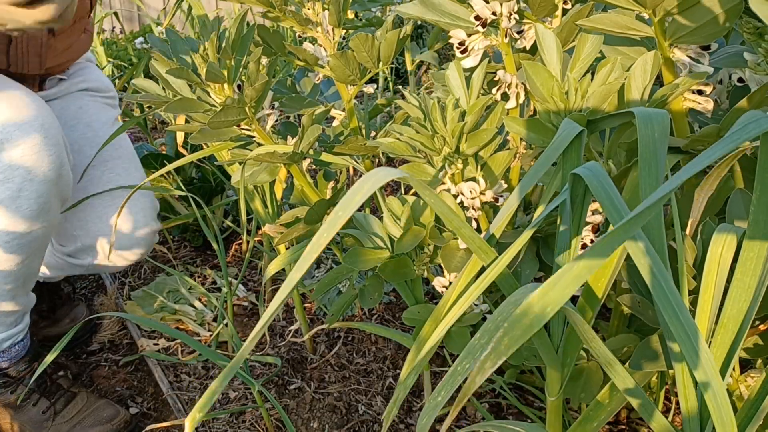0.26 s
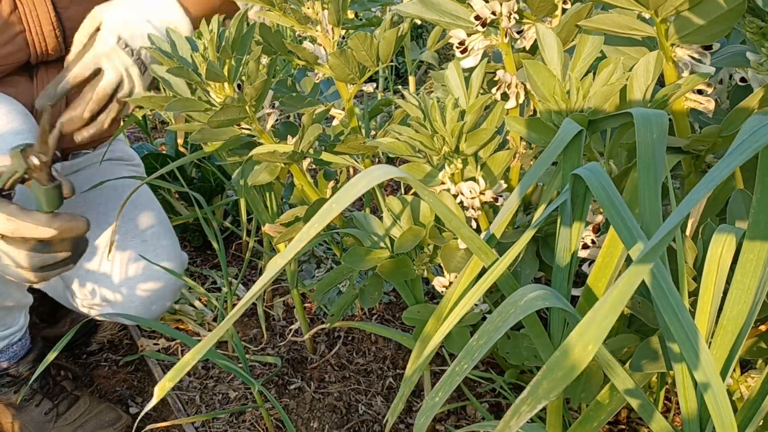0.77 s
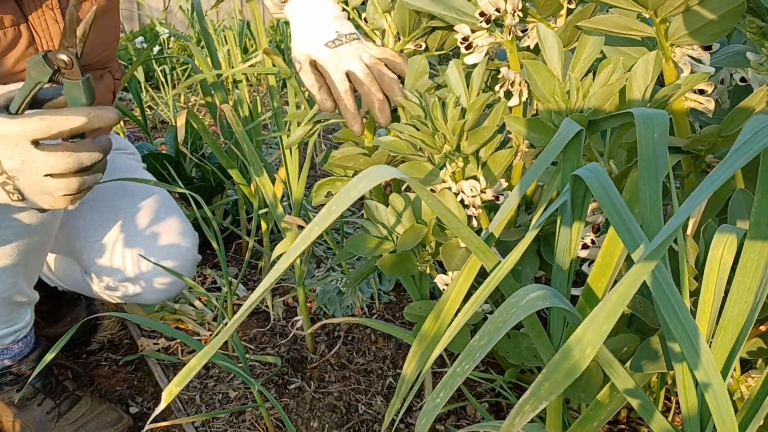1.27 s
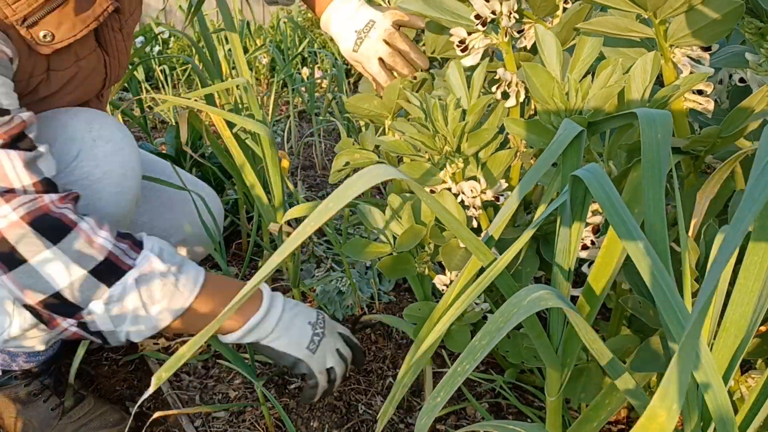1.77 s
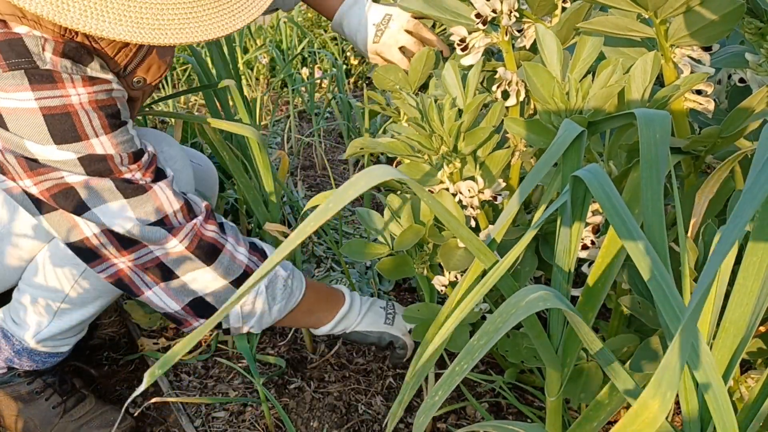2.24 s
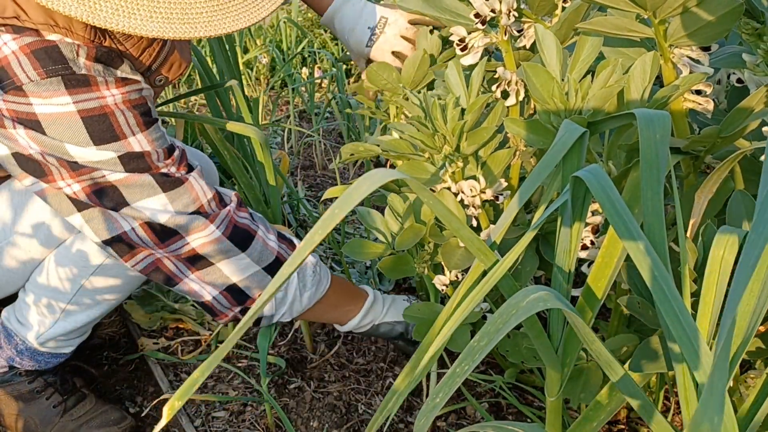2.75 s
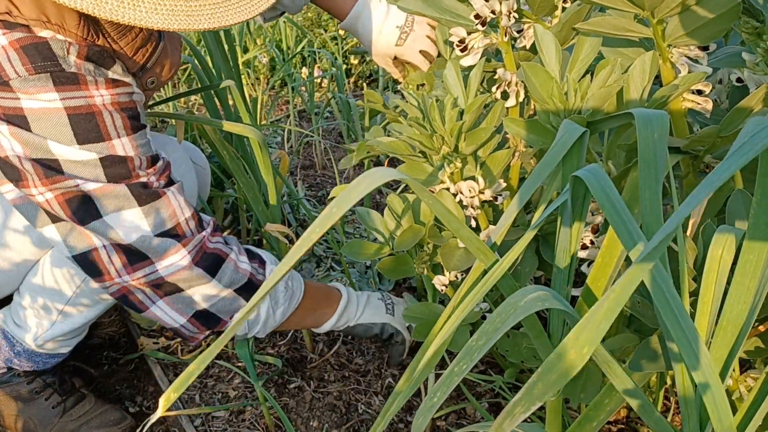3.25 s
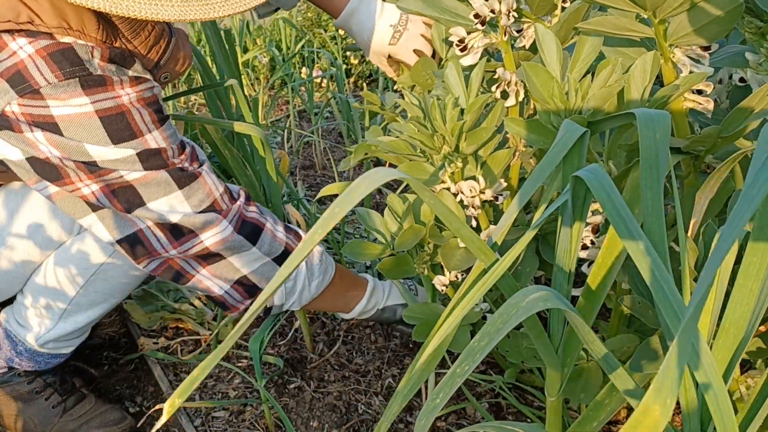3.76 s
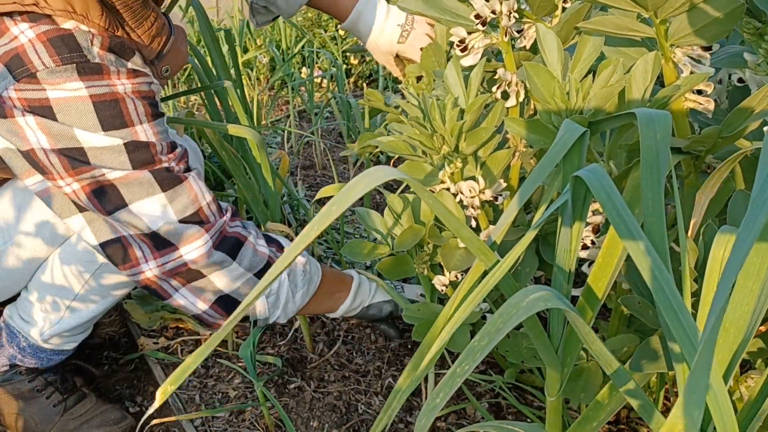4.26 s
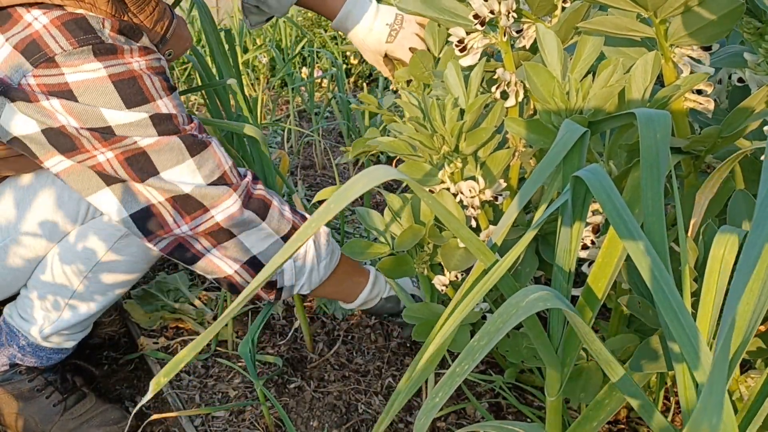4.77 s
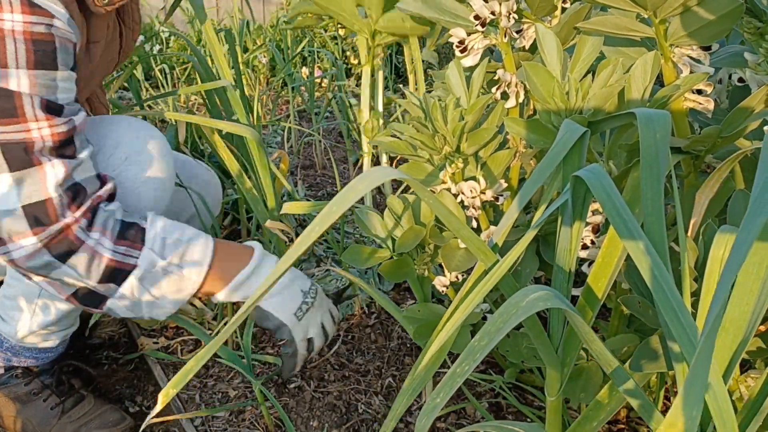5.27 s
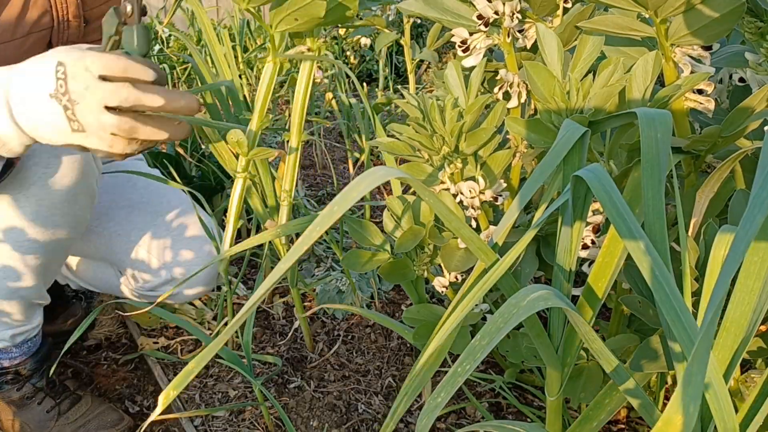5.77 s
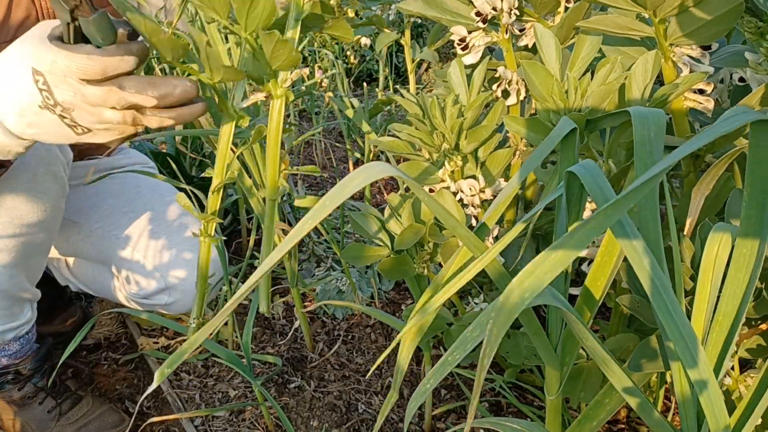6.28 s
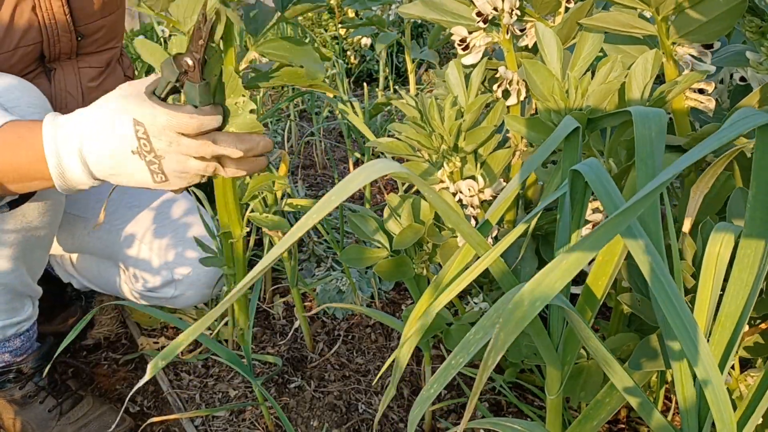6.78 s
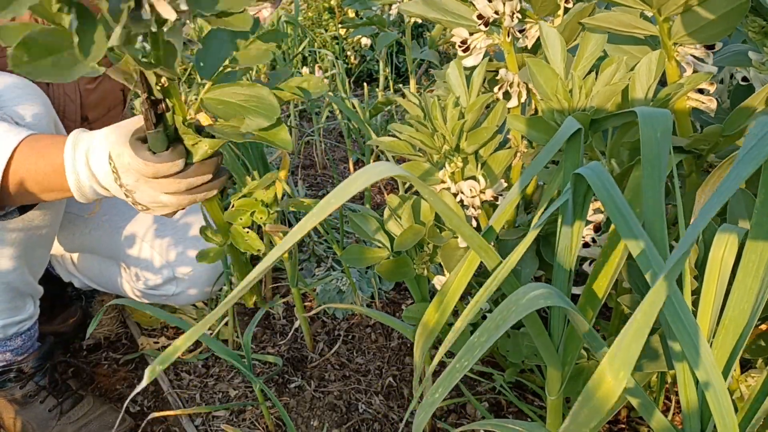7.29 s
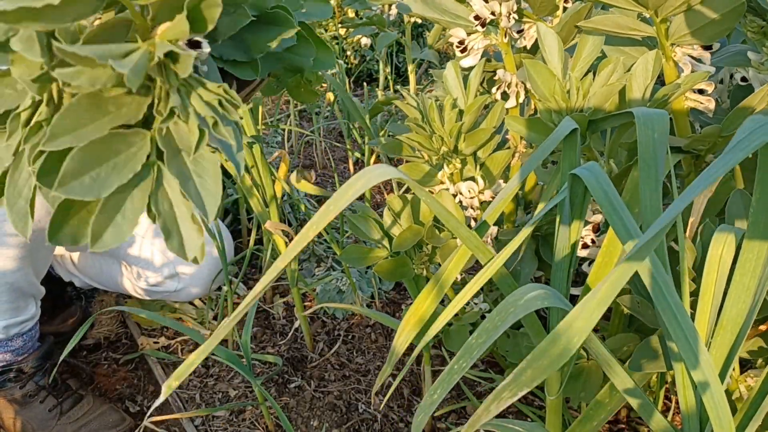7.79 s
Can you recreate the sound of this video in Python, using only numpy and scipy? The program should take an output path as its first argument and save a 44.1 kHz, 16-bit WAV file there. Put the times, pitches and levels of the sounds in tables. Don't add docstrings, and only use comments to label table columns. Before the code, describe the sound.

A gardener works among leafy plants: dry rustling begins at left and moves to the centre, with small leaf flicks. Two brief metallic snips, each with cracking stem fibres and a short leaf shiver, come about two seconds apart. Then the rustle swells on the left as cut foliage is handled and crushed, and a glove squeaks faintly. Breeze buffets the close stereo microphone in dull lumps, heaviest in the last third.

```python
import sys
import numpy as np
from scipy import signal
from scipy.fft import rfft, irfft, next_fast_len
from scipy.io import wavfile
from scipy.ndimage import uniform_filter1d, map_coordinates

SR = 44100
rng = np.random.default_rng(int(sys.argv[2]) if len(sys.argv) > 2 else 0)


def waveform_to_disk(signal):
    frames = np.transpose(np.atleast_2d(signal))
    scaled = np.clip(frames, -1, 1) * 32767
    samples = np.round(scaled).astype(np.int16)
    wavfile.write(sys.argv[1], SR, samples)


def boost_factor(decibels):
    exponent = np.asarray(decibels, float) / 20
    return 10 ** exponent


N = 354563
TOP_HZ = 15870


def unit(x):
    return x / np.sqrt(np.mean(x ** 2) + 1e-20)


def along(points, hz):
    point_hz, value = np.transpose(points)
    return np.interp(np.log(hz + 1), np.log(point_hz + 1), value)


def curves(rows):
    s, *columns = np.transpose(rows)
    return [np.interp(np.arange(N) / SR, s, column) for column in columns]


def wobble(rate):
    points = rng.standard_normal(int(N * rate / SR) + 4)
    return map_coordinates(points, [np.arange(N) * rate / SR])


def filtered(x, response):
    n = x.shape[-1]
    padded = next_fast_len(n + 4096)
    spectrum = rfft(x, padded) * response(np.fft.rfftfreq(padded, 1 / SR))
    return irfft(spectrum, padded)[..., :n]


def resonance(modes):
    def response(f):
        total = 0
        for k, (centre, width, db) in enumerate(modes):
            damping = 1j * f * width
            total = total + (-1) ** k * boost_factor(db) * damping / (centre * centre - f * f + damping)
        return total
    return response


def add(track, s, sound):
    i = max(round(s * SR), 0)
    track[..., i:i + sound.shape[-1]] += sound[..., :N - i]


def swell(start, hold, db, rise, fall):
    t = np.arange(N)[::32] / SR
    return db - rise * np.maximum(start - t, 0) - fall * np.maximum(t - start - hold, 0)


def power_sum(levels_db):
    gain = np.sqrt(sum(boost_factor(2 * db) for db in levels_db))
    return np.interp(np.arange(N), np.arange(N)[::32], gain)


def patchy(x, patchy_db):
    z = signal.stft(x, nperseg=512)[2]
    field = uniform_filter1d(rng.standard_normal(z.shape[1:]), size=7, axis=0)
    field = uniform_filter1d(field, size=7, axis=1)
    return signal.istft(z * boost_factor(patchy_db * unit(field)), nperseg=512)[1][:, :N]


def ports(x, apart, corner_hz=3000):
    # start_s, left_lead_samples
    bearing = [(0, 10.1), (.4, 8.9), (.9, 6.9), (1.3, 0.31), (5.2, 0.63), (5.45, 2.5), (6.1, 6.1),
               (7.4, 6.9), (8.04, 4.7)]
    late = map_coordinates(x[0], [np.arange(N) - curves(bearing)[0]], order=3)
    share = lambda hz: np.clip(apart * hz / (hz + corner_hz), 0, 1)
    direct = filtered(np.array([x[0], late]), lambda hz: np.sqrt(1 - share(hz)))
    return direct + filtered(x[1:], lambda hz: np.sqrt(share(hz)))


def garden():
    # pitch_hz, level_db per Hz
    air = [(88, -44.5), (150, -6.5), (222, -2.5), (514, -14.5), (1190, -16), (3000, -27.5), (6640, -22),
           (8600, -27), (15500, -34)]
    # start_s, pitch_hz, level_db
    hum = [(0, 219, -90.5), (1.7, 213.7, -72.5), (2.3, 224.4, -77.5), (2.42, 228, -62), (2.55, 219.6, -86),
           (3.5, 229.5, -61), (4.6, 220.8, -84), (8.04, 202.8, -66.5)]
    noise = rng.standard_normal((2, N))
    hush = unit(filtered(noise, lambda hz: boost_factor(along(air, hz)) * (hz < TOP_HZ)))
    hz, db = curves(hum)
    waver = .03 * wobble(20)
    flicker = wobble(35) * boost_factor(4 * wobble(9))
    tone = np.sin(2 * np.pi * np.cumsum(hz * (1 + waver)) / SR)
    return boost_factor(-71.0) * hush + tone * boost_factor(db + 1.5) * flicker


def rustle():
    # pitch_hz, level_db per Hz
    leaf_colour = [(350, -31), (600, -12), (900, -8.5), (2100, -2.5), (2900, -5.5), (4300, -1.5),
                   (7000, -0.5), (8500, -7), (12500, 0.5), (15500, -4.5)]
    # start_s, hold_s, level_db, crisp_share_db,
    # fall_db_per_s
    leaf_strokes = [(0.0, 0.03, -61, 1, 119), (0.152, 0.052, -58.5, 2.5, 104), (0.367, 0.03, -74.5, 2.5, 90),
                    (0.93, 0.11, -62.5, -0.5, 74), (1.253, 0.17, -69.5, 1, 100), (1.411, 0.26, -64, -4.5, 62),
                    (1.842, 0.1, -66, -2.5, 28), (2.107, 0.095, -76, -12, 100), (2.268, 0.072, -70.5, 3.5, 250),
                    (2.434, 0.054, -67, 5.5, 187), (2.663, 0.1, -64, -0.5, 68), (2.87, 0.14, -60, -6.5, 200),
                    (3.077, 0.036, -58, 0, 61.5), (3.512, 0.016, -70, -0.5, 126), (3.714, 0.069, -70, -6, 68),
                    (4.048, 0.14, -72.5, -15, 47), (4.197, 0.034, -82, 4.5, 106), (4.41, 0.067, -74, -3, 122),
                    (4.606, 0.14, -74, -9, 153), (4.857, 0.017, -64.5, 0, 392), (4.929, 0.014, -57, -2.5, 154),
                    (5.02, 0.19, -71.5, -3.5, 36),
                    (5.679, 0.235, -69, -3, 40.2), (5.98, 0.275, -72, -8.5, 99), (6.376, 0.11, -62.5, 4, 59.7),
               (6.56, 0.12, -64, -1.5, 60), (6.7, 0.037, -54.5, 1, 60), (6.78, 0.06, -53.5, 3.5, 119.8),
               (6.912, 0.067, -50.5, -1, 151), (7.02, 0.089, -53.5, -0.5, 201), (7.151, 0.034, -53, 0, 350),
               (7.22, 0.067, -65, 1, 78), (7.43, 0.052, -73.5, 7.5, 148), (7.501, 0.13, -74.5, 4, 100),
               (7.68, .36, -73, -1, 100)]
    # start_s, hold_s, level_db
    scuffs = [(0.0, 0.014, -70.5), (0.175, 0.065, -64.5), (0.377, 0.0077, -77), (0.967, 0.24, -81),
              (1.426, 0.083, -82), (2.733, 0.032, -75), (3.06, 0.078, -67.5), (4.86, 0.1, -66.5),
              (5.267, 0.099, -80), (6.054, 0.044, -76), (6.431, 0.045, -79), (6.47, 0.046, -64),
              (7.84, 0.13, -79)]
    rise, scuff_fall = 317, 175

    grains = (rng.random(N) < 500 / SR) * boost_factor(3.1 * np.minimum(rng.exponential(size=N), 3.5))
    grit = signal.fftconvolve(grains, boost_factor(-60 * np.arange(200) / SR / 0.0097))[:N]
    flutter = boost_factor(0.6 * wobble(35) + 1.1 * wobble(90))
    rub = rng.standard_normal((3, N)) * (1 + 0.38 * unit(grit)) * flutter
    rub = ports(patchy(rub, patchy_db=1.87), apart=1.0)
    rub = filtered(rub, lambda hz: boost_factor(along(leaf_colour, hz)) * (hz < TOP_HZ))

    step = lambda hz, edge_hz: 1 / (1 + (hz / edge_hz) ** 8)
    body = filtered(rub, lambda hz: step(hz, 2150))
    crisp = filtered(rub, lambda hz: 1 - step(hz, 7670))
    middle = rub - body - crisp

    strokes = [(swell(s, hold, db, rise, fall), crisp_db) for s, hold, db, crisp_db, fall in leaf_strokes]
    leaf = power_sum([db for db, _ in strokes])
    bright = power_sum([db + crisp_db for db, crisp_db in strokes])
    deep = boost_factor(-14.5 - 61.0) * (leaf / boost_factor(-61.0)) ** 1.32
    deep = np.hypot(deep, power_sum([swell(*row, rise, scuff_fall) for row in scuffs]))

    own = lambda: boost_factor(0.65 * wobble(15))
    mix = leaf * own() * unit(middle) + bright * own() * unit(crisp) + deep * own() * unit(body)
    return boost_factor([[.4], [-.4]]) * mix


def wind():
    # pitch_hz, level_db per Hz
    buffet = [(22, -49), (54, -4.5), (70, -0.5), (112, 3), (180, -12.5), (230, -12), (500, -38.5),
              (800, -71), (1600, -110)]
    # start_s, hold_s, level_db
    left_gusts = [(0, 0.014, -60), (.36, 0.044, -55.5), (.5, 0.14, -63), (.78, 0.14, -62.5),
                  (.95, 0.023, -47.5), (1.01, 0.14, -38), (1.24, 0.19, -47.5), (1.5, 0.11, -43),
                  (1.72, 0.076, -66), (1.85, 0.64, -85), (3.03, 0.11, -39.5), (3.26, .2, -60),
                  (3.72, 0.36, -45), (4.33, 0.088, -55.5), (4.55, 0.031, -47.5), (4.7, 0.25, -52.5),
                  (5.0, 0.34, -49.5), (5.45, 0.17, -52.5), (5.65, 0.13, -33), (5.82, 0.094, -40),
                  (5.92, 0.076, -46), (6.07, 0.29, -38.5), (6.4, 0.72, -35), (6.92, 0.09, -32.5),
                  (7.15, 0.31, -44.5), (7.57, 0.096, -41.5), (7.71, 0.13, -39), (7.83, 0.2, -47)]
    # start_s, hold_s, level_db
    right_gusts = [(.15, 0.24, -68), (.75, 0.045, -88), (.98, 0.18, -41.5), (1.25, 0.36, -44.5),
                   (1.72, 0.0085, -57.5), (1.87, 0.68, -78), (2.9, 0.17, -60.5), (3.06, 0.24, -42),
                   (3.33, 0.5, -45), (3.72, 0.079, -41.5), (3.9, 0.097, -45.5), (4.1, 0.029, -45),
                   (4.63, 0.18, -50.5), (4.88, 0.044, -38), (5.14, 0.17, -44), (5.5, 0.046, -45.5),
                   (5.62, 0.14, -46), (5.7, 0.19, -34), (5.92, 0.13, -34), (6.12, 0.16, -34),
                   (6.36, 0.29, -37), (6.72, 0.3, -28.5), (7.08, 0.18, -32), (7.25, 0.1, -38.5),
                   (7.5, 0.24, -32.5), (7.71, .24, -37)]
    # loudest_s, peak_db, width_ms
    left_eddies = [(.85, -51, 3), (1.056, -26, 2.25), (1.086, -22, 0.92), (1.152, -27.5, 2.2),
                   (1.301, -28.5, 1.65), (1.587, -44, 0.92), (2.882, -33, 1.67), (3.959, -35.5, 2.8),
                   (4.593, -36.5, 1.66), (4.868, -32, 1.67), (4.913, -30.5, 0.33), (5.493, -35.5, 3.5),
                   (5.633, -11.5, 1.08), (5.682, -22, 2.4), (5.769, -17.5, 0.97), (5.835, -24.5, 1.9),
                   (6.076, -29.5, 1.45), (6.286, -18.5, 1.9), (6.322, -17, 1.64), (6.464, -20.5, 1.08),
                   (6.582, -21.5, 1.6), (6.741, -21, 1.6), (6.769, -22.5, 1.34), (6.834, -19.5, 1.2),
                   (6.933, -21, 1.03), (6.97, -25, 0.84), (7.101, -28, 1.8), (7.334, -19.5, 1.9),
                   (7.595, -23.5, 1.75), (7.728, -24, 1.25), (7.77, -25, 1.75)]
    # loudest_s, peak_db, width_ms
    right_eddies = [(1.049, -32, 1.5), (1.081, -18.5, 1.66), (1.52, -42, 3.5), (2.883, -37, 1.35),
                    (3.0392, -23, 0.42), (3.0444, -13.5, 0.78), (3.235, -30, 1), (3.689, -31.5, 0.58),
                    (3.7, -15, 1.66), (3.891, -23, 1.1), (4.083, -25.5, 1.17), (4.913, -30.5, 0.59),
                    (5.167, -25, 1.25), (5.203, -27, 3.4), (5.73, -13, 1.04), (5.819, -21, 1.34),
                    (5.89, -9, 1.28), (6.204, -19.5, 1.32), (6.444, -15.5, 1.06), (6.476, -21, 0.86),
                    (6.623, -17, 1.1), (6.751, -24, 1.4), (6.896, -10.5, 0.87), (7.02, -15.5, 1.85),
                    (7.129, -25.5, 1.4), (7.166, -12.5, 0.74), (7.5044, -21.5, 0.51), (7.51, -8.5, 1.15),
                    (7.596, -10, 0.74), (7.605, -16, 0.84), (7.692, -14.5, 0.82), (7.876, -16.5, 1.27),
                    (7.898, -23, 0.68)]
    rise, fall, calm_db = 580, 232, -74.5
    hiss_low_hz, hiss_high_hz, hiss_db = 322, 900, -69.5

    lumps = boost_factor(8.76 * np.tanh(np.array([wobble(30), wobble(30)])))
    rumble = unit(filtered(lumps * rng.standard_normal((2, N)), lambda hz: boost_factor(along(buffet, hz))))
    puffs = lambda gusts: power_sum([swell(*row, rise, fall) for row in gusts] + [calm_db])
    gust = np.array([puffs(left_gusts), puffs(right_gusts)])

    low_edge = lambda hz: 1 + (hiss_low_hz / (hz + 1)) ** 4
    high_edge = lambda hz: 1 + (hz / hiss_high_hz) ** 4
    hiss = filtered(rng.standard_normal((2, N)), lambda hz: (hz < TOP_HZ) / (low_edge(hz) * high_edge(hz)))
    hiss_gain = boost_factor(hiss_db) * (gust / boost_factor(-40)) ** 0.47
    out = rumble * gust + unit(hiss) * hiss_gain * unit(lumps ** 0.55)

    for port, eddies in zip(out, (left_eddies, right_eddies)):
        for s, db, width_ms in eddies:
            thump, loudest = eddy(width_ms)
            add(port, s - loudest, boost_factor(db - 2.37) * thump)
    return out


def eddy(width_ms, cut_hz=98):
    t = np.arange(3000) / SR - .015
    bump = np.exp(-.5 * (t / (0.0012 * max(width_ms, .4))) ** 2)
    ring = signal.sosfilt(signal.butter(6, cut_hz, "high", fs=SR, output="sos"), bump)
    strength = np.abs(signal.hilbert(ring))
    return ring / strength.max(), strength.argmax() / SR


def ticks(rows, deep_db, gain_db):
    out, t = np.zeros((3, N)), np.arange(900) / SR
    shape = (1 - np.exp(-t / .00015)) * (boost_factor(-60 * t / .006) + boost_factor(-16 - 60 * t / .03))
    for s, db, hz in rows:
        burst = rng.standard_normal((3, len(t))) * shape
        burst[0, 8] += 2.5
        ring = resonance([(hz, 2200, -.6)])
        broad = lambda f: boost_factor(deep_db + 1.3 * (db + 42.0)) / (1 + 1j * f / 7000) ** 2
        thin = lambda f: (1j * f / (560 + 1j * f)) ** 3 * (f < TOP_HZ)
        burst = filtered(burst, lambda f: (ring(f) + broad(f)) * thin(f))
        add(out, s + 0.00017, boost_factor(db + gain_db) * burst / np.abs(burst[0]).max())
    return out


def leaf_ticks():
    # start_s, peak_db, centre_hz
    clear = [(0.0728, -50, 4860), (0.188, -45.5, 12800), (0.381, -50, 1400), (0.6113, -60, 13700),
             (0.907, -47.5, 5870), (0.9453, -51, 6020), (1.0644, -50, 12700), (1.6259, -52, 5170),
             (1.942, -50.5, 3540), (2.4362, -46.5, 7260), (2.463, -51, 13300), (2.5135, -49, 7350),
             (4.7343, -58, 6270), (5.187, -54, 13400), (5.4546, -55.5, 4920), (6.2592, -53.5, 13470),
             (6.5472, -45, 12300), (6.6143, -43, 4300), (6.6438, -49, 4500), (6.748, -38, 11900),
             (6.782, -42, 5270), (6.8149, -37, 7250), (6.9635, -39.5, 6950), (7.4302, -49, 6160),
             (7.4432, -49, 6100), (7.9276, -59, 6310), (7.956, -52, 5400), (7.978, -61, 5100),
             (8.0027, -50, 7200)]
    # start_s, peak_db, centre_hz
    faint = [(0.0523, -48, 12700), (0.8674, -46, 5800), (1.6571, -42, 4890), (2.1954, -45, 6650),
             (2.2209, -54, 7140), (2.243, -44, 13500), (2.3017, -53, 13500), (2.3521, -43, 12300),
             (2.4159, -46, 6960), (2.6274, -44, 5920), (2.835, -38.5, 4200), (2.9083, -37, 4780),
             (3.18, -32, 4500), (3.355, -45, 5800), (3.5324, -37.5, 5580), (3.7229, -45, 6220),
             (3.7419, -45, 5740), (4.6813, -47, 3840), (4.6952, -45, 6290), (4.712, -43, 6330),
             (5.879, -37.5, 4300), (6.0062, -56, 4750), (6.338, -50, 13400), (6.8588, -33, 14100)]
    return ticks(clear, -13, 5.5) + ticks(faint, -13, -7)


def stem_fibres():
    # start_s, peak_db, centre_hz
    fibres = [(3.0046, -41, 4690), (3.0364, -26.5, 4540), (3.0388, -27, 2720), (3.0455, -31, 11500),
              (3.0495, -43, 5500), (3.0555, -41, 11000), (4.917, -39, 14000), (4.8238, -54, 5560),
              (4.8324, -36, 3820), (4.8328, -41, 950), (4.859, -39, 900), (4.8448, -45, 3040),
              (4.8462, -42, 11500), (4.8528, -45, 3620), (4.8587, -31.5, 3500), (4.9096, -22, 3600)]
    return ticks(fibres, -10, 5.5)


def cuts():
    cut_times = [
        3.0410,
        4.9109,
    ]
    # push_db, push_hz, push_width_ms, clack_db, clack_t60_s (time to fall 60 dB)
    cut_parts = [
        (-19.5, 1200, .6, -14.5, .007),
        (-19, 920, .48, -12.5, .006),
    ]
    # pitch_hz, width_hz, level_db
    blades = [
        [(2150, 480, -6), (2720, 380, 1), (4690, 700, -2), (7400, 500, -2), (8400, 610, -11), (10000, 650, -2),
         (11220, 630, -2.5), (12300, 410, -2.5), (14770, 500, -6.5)],
        [(1290, 440, -3), (2170, 700, 3), (3300, 600, -8.5), (4460, 830, -12), (6170, 550, 2.5), (9950, 530, 0),
         (11200, 500, -6), (12300, 990, -2), (14700, 1100, -15.5)],
    ]
    # level_db, t60_s
    shivers = [
        (-43, .2),
        (-47, .15),
    ]
    # pitch_hz, level_db per Hz
    shaken = [(290, -30.5), (500, 4.5), (1270, -6.5), (1390, -5), (4190, -3.5), (5510, -3.5), (8600, -9.5),
              (11500, -8.5), (15500, -2)]

    out, t = np.zeros((3, N)), np.arange(SR // 4) / SR
    for s, parts, (shiver_db, shiver_t60), modes in zip(cut_times, cut_parts, shivers, blades):
        push_db, push_hz, width_ms, clack_db, t60 = parts
        u = t - .002
        push = np.cos(2 * np.pi * push_hz * u) * np.exp(-.5 * (1000 * u / width_ms) ** 2)

        after = np.maximum(t - .0027, 0)
        shape = (1 - np.exp(-after / 0.00023)) * (boost_factor(-60 * after / t60) + boost_factor(-9.5 - 60 * after / 0.022))
        strike = rng.standard_normal((3, len(t))) * shape
        strike[:, round(.0032 * SR)] += [2.2, 2.2, -2.2]
        z = rfft(strike)
        evened = z / np.sqrt(uniform_filter1d(np.abs(z) ** 2, size=150))
        blow = irfft(evened, len(t)) * (after > 0)
        ring = resonance(modes)
        clack = filtered(blow, lambda f: (.1 * (f > 1500) + ring(f)) * boost_factor(-(f / TOP_HZ) ** 40))

        noise = rng.standard_normal((3, len(t)))
        shiver = unit(filtered(noise, lambda hz: boost_factor(along(shaken, hz)) * (hz < TOP_HZ)))
        shiver = shiver * (after > 0) * boost_factor(-60 * after / shiver_t60)

        add(out, s - .002, boost_factor(clack_db) * clack / np.abs(clack).max() + boost_factor(shiver_db) * shiver)
        add(out[0], s - .002, boost_factor(push_db) * push)
    return out


def hand_crackle():
    # start_s, peak_db, centre_hz
    crackle = [(6.338, -55, 5800), (6.3703, -52, 6810), (6.677, -45, 14000), (6.6968, -45, 4680),
               (6.781, -43, 13900), (6.7883, -40, 12100), (6.9416, -28, 7060), (6.9536, -37, 7000),
               (6.9894, -39, 7030), (7.1786, -44, 5130), (7.2246, -50, 6810), (7.3694, -52, 5890),
               (7.4744, -46, 10000), (7.7378, -48, 7360), (7.7937, -46, 6020)]
    return ticks(crackle, -16, 0)


def creak():
    # start_s, peak_db
    creaks = [(7.2264, -58), (7.2534, -74), (7.2786, -64), (7.296, -65), (7.331, -62), (7.4046, -72),
              (7.5552, -72), (7.5714, -64), (7.5797, -67), (7.5797, -59), (7.5977, -64), (7.6064, -63),
              (7.618, -64), (7.6304, -62), (7.663, -66), (7.6975, -66), (7.7169, -65), (7.7264, -63),
              (7.735, -62), (7.7483, -59), (7.764, -60), (7.776, -66), (7.8186, -63), (7.842, -63),
              (7.864, -65), (7.886, -71), (7.9279, -64), (8.004, -66)]
    # pitch_hz, width_hz, level_db
    grip = [(7330, 250, 15.5), (11000, 1100, 9.5), (12800, 730, -1)]
    slips, t = np.zeros((3, N)), np.arange(260) / SR
    for s, db in creaks:
        click = rng.standard_normal((3, len(t))) * boost_factor(-60 * t / 0.0088)
        late_s = 0.00022 * rng.standard_normal()
        add(slips, s + late_s, boost_factor(db + 7.5 + 0.78 * rng.standard_normal()) * click)
    ring = resonance(grip)
    return filtered(slips, lambda f: (ring(f) + 0.12 * (f > 3500)) * (f < TOP_HZ))


def scene():
    # centre_hz, width_hz, level_db
    port_dip = [(1755, 120, -5.5), (486, 59, -8), (8300, 430, -3.5)]
    dip = lambda hz, centre, width, db: db * np.exp(-.5 * ((hz - centre) / width) ** 2)
    dips = lambda hz: boost_factor(sum(dip(hz, *row) for row in port_dip))

    bed = filtered(garden() + rustle() + wind(), lambda hz: hz < TOP_HZ)
    small = leaf_ticks() + stem_fibres() + hand_crackle() + creak()
    small = ports(filtered(small, lambda hz: dips(hz) * (hz < TOP_HZ)), apart=.8)
    snips = ports(filtered(cuts(), dips), apart=0.52)
    return bed + small + snips


def low_pass(x):
    return signal.sosfilt(signal.butter(12, 16840, fs=SR, output="sos"), x)


def record(dry):
    return low_pass(dry)


dry = scene()
out = record(dry)
waveform_to_disk(out)
```